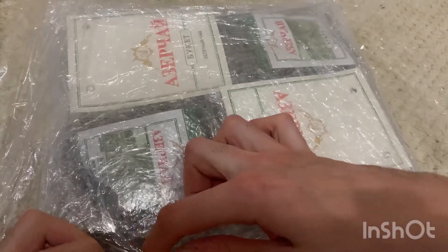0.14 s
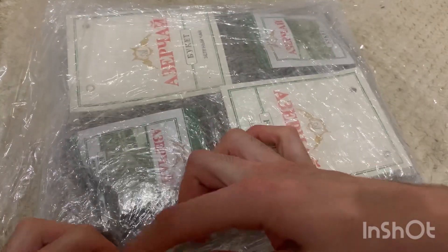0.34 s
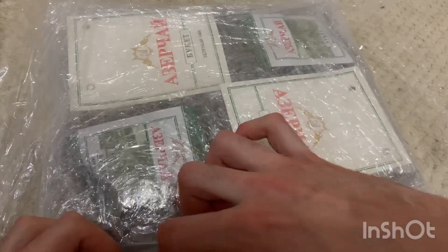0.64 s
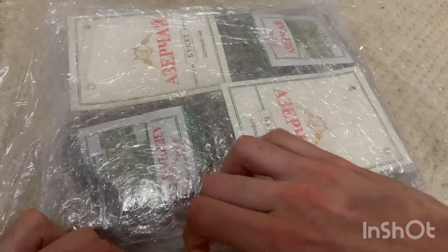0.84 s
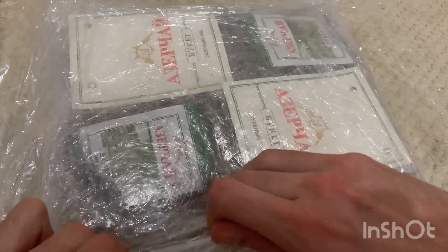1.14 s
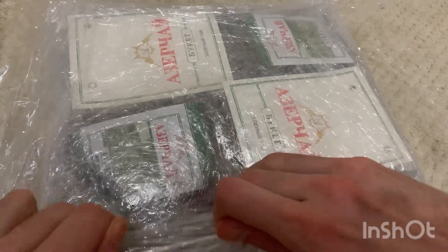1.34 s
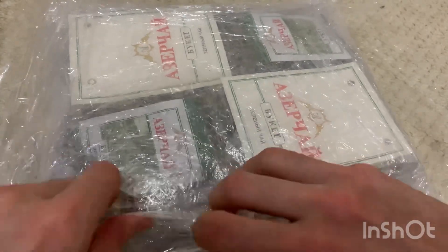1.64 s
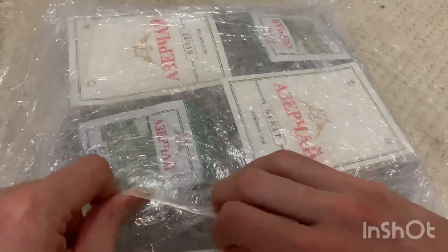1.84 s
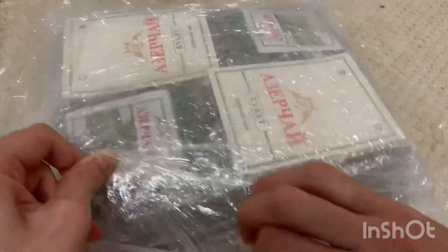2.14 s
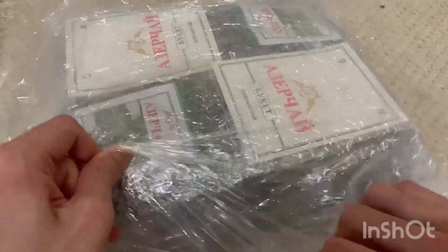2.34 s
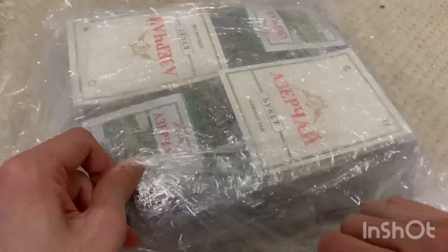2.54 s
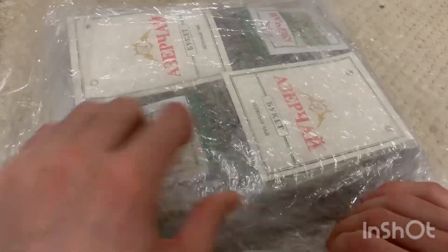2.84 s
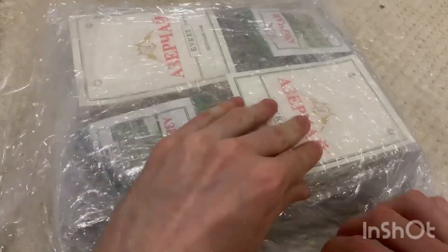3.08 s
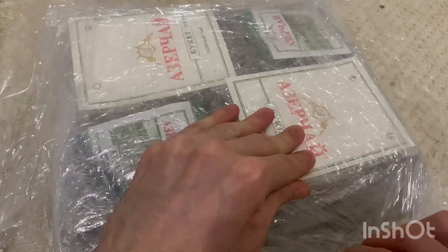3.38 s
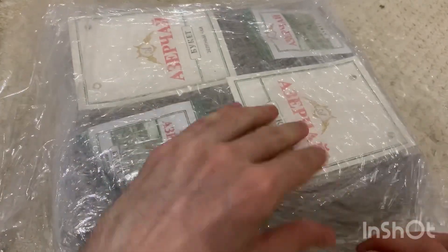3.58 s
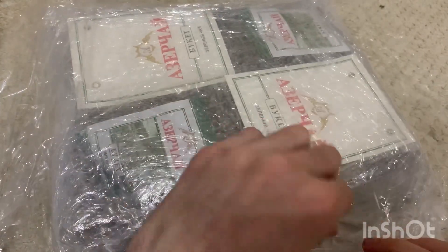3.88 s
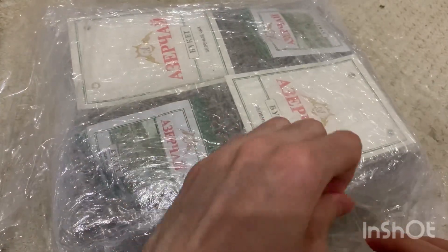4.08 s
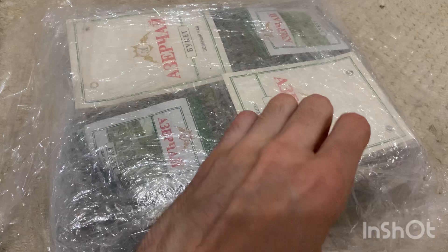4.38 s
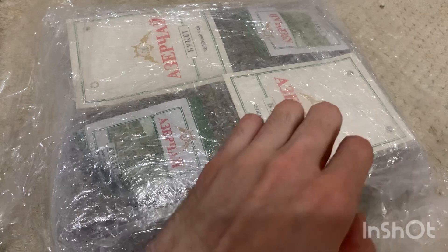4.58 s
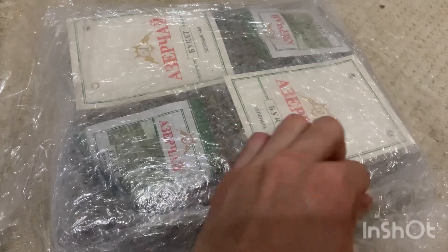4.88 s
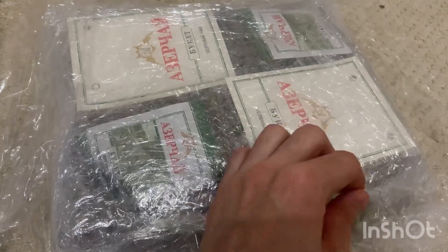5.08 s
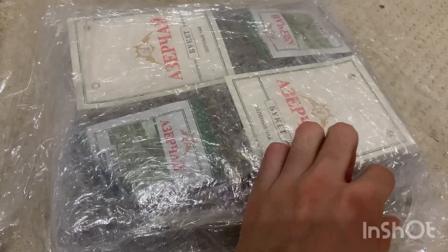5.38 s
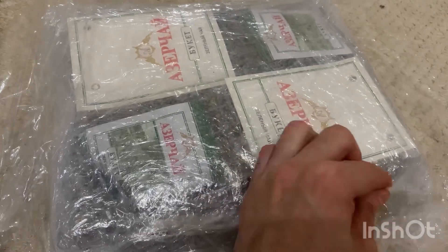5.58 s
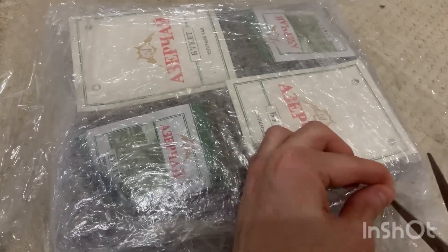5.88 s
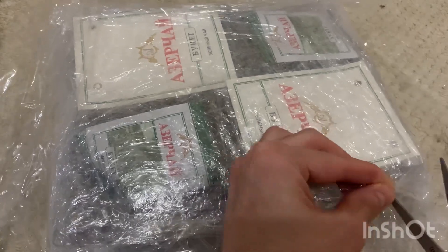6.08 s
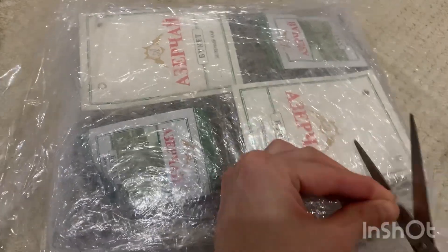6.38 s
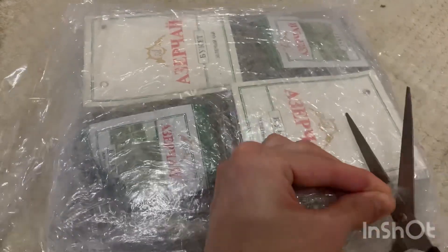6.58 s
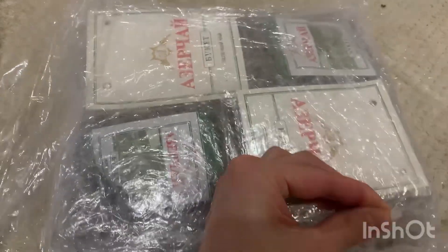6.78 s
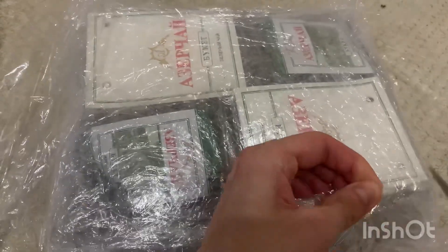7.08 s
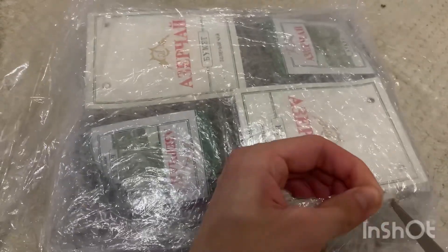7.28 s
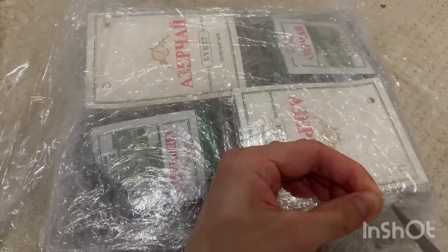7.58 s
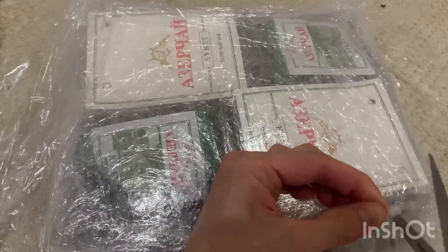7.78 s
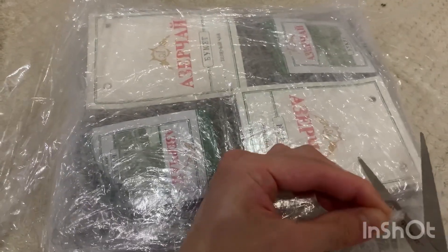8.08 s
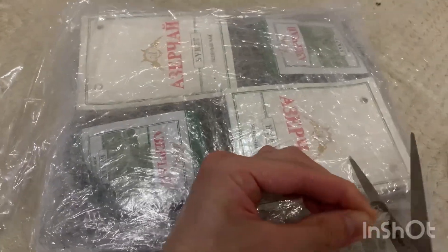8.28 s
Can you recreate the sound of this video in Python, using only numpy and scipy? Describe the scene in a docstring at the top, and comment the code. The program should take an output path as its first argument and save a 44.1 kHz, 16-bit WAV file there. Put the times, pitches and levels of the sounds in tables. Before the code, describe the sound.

Hands tug clingy film off a bundle: bright crackling swells, sharp snaps and dull pops, later only faint rustles with a few sudden cracks.

```python
"""Peeling plastic stretch wrap

Two hands pull stretch wrap off a bundle of packs, close to a stereo microphone in a small room.
Each stroke drives swarms of tiny cracks, coloured as sheet, creases and cling; wrinkles tick above them.
Creases snap with noise kicks and diving twangs, slack film pops, shifting packs rub through a resonance.
The work moves from the left hand to the right, over filtered-noise room air and a wavering hum."""
import sys
import numpy as np
from scipy import signal
from scipy.fft import rfft, irfft, next_fast_len
from scipy.io import wavfile
from scipy.ndimage import uniform_filter1d, map_coordinates

SR = 44100
rng = np.random.default_rng(int(sys.argv[2]) if len(sys.argv) > 2 else 0)


def bounce(signal):
    """Save signal as a 16-bit WAV file at the path given by the first command-line argument."""
    frames = np.transpose(np.atleast_2d(signal))
    limited = np.clip(frames, -1, 1)
    pcm = np.round(limited * 32767).astype(np.int16)
    wavfile.write(sys.argv[1], SR, pcm)


N = 371763

# Room air. Each row: frequency in Hz, relative density in dB per Hz.
AIR_SPECTRUM = [(20, -23), (50, 15), (85, 11.5), (130, 6.5), (300, 5), (1000, -23), (4000, -56),
                (15000, -47)]
# Hand strokes. Each row: peak time in s, rise in s, fall in s, crackle in dB before voice trims,
# flapping of the sheet against that in dB.
STROKES = [(.057, 0.35, 0.065, -41.5, -7), (.257, 0.1, 0.031, -40.5, -2.5), (.45, .15, 0.44, -37, -6.5),
           (.665, 0.1, 0.19, -32.5, -7), (1.039, 0.16, 0.21, -30.5, -6.5), (1.208, 0.039, 0.024, -28, -5.5),
           (1.34, 0.055, 0.081, -38.5, -23), (1.62, 0.19, 0.25, -40.5, -1), (1.712, 0.029, 0.047, -31.5, 3),
           (1.904, 0.3, 0.23, -32.5, -3.5), (2.144, 0.16, 0.17, -24.5, -8.5),
           (2.367, 0.29, 0.22, -28.5, -6.5), (2.565, 0.05, 0.31, -32.5, -6.5), (2.82, 0.13, 0.18, -33, -4),
           (3.064, 0.14, 0.67, -32.5, -3.5), (3.262, 0.027, 0.33, -30.5, -9.5),
           (3.42, 0.025, 0.25, -31.5, -11), (3.747, 0.05, 0.14, -36, -4), (3.872, 0.027, 0.26, -34.5, -5.5),
           (4.069, 0.012, 0.023, -29.5, -9), (4.185, 0.12, 0.25, -40, -6), (4.35, 0.12, 0.048, -48, -4),
           (4.742, 0.14, 0.12, -40, -11.5), (5.457, 0.057, 0.41, -42, -3), (5.635, 0.015, 0.48, -46, -5),
           (5.888, 0.3, 0.15, -38, -3), (6.24, 0.41, 0.021, -39.5, -10), (6.37, 0.14, 0.17, -35, -7),
           (6.659, 0.02, 0.056, -25.5, -5), (6.76, 0.24, 0.093, -37, -4.5), (6.97, 0.076, 0.03, -42.5, 1.5),
           (7.137, 0.98, 0.23, -45, -7), (7.33, 0.031, 0.17, -43.5, -18), (7.889, 0.031, 0.11, -43.5, -5)]
# Grip that keeps the film rustling between strokes. Each row: time in s, level in dB before voice trims.
GRIP = [(0, -42), (1.5, -40.5), (2.5, -47.5), (2.95, -58), (3.5, -43), (3.7, -39.5), (3.83, -50),
        (3.92, -42.5), (4.35, -41), (4.6, -54), (5.1, -53), (5.33, -44), (6.05, -53.5), (6.55, -66),
        (7.4, -51.5), (7.78, -51), (8.1, -50), (8.43, -48)]
# Tack, high while layers are peeled apart, low while the film is only pressed.
# Each row: time in s, cling against creases in dB before voice trims.
TACK = [(0, 2.5), (1.4, 5.5), (2.3, 4), (3.5, -0.5), (4.1, 0.5), (4.7, -3), (5.4, 0.5), (5.7, -1),
        (6.5, -1.5), (7.2, 1.5), (8.43, 0)]
# Stuck stretches that rip free at once. Each row: start in s, length in s, surge in dB.
RIPS = [(1.701, 0.017, 8.5), (1.881, 0.011, 6), (2.13, 0.011, 2.5), (2.367, 0.011, 7.5), (6.647, 0.013, 3)]
# Three voices of the film. Each row: frequency in Hz, relative density in dB per Hz.
SHEET_SPECTRUM = [(25, -30), (60, -21), (150, -6.5), (240, 1.5), (450, 0.5), (650, -3.5), (900, -3),
                  (1400, -6), (3000, -45)]
CREASE_SPECTRUM = [(250, -66.5), (700, -3), (1000, -5.5), (1600, -0.5), (2700, 0), (4200, -1), (5600, -1),
                   (6800, -6), (10000, -67)]
CLING_SPECTRUM = [(3000, -102), (6000, -3.5), (7500, 1.5), (9000, 4), (11500, 0.5), (14000, 3.5),
                  (15600, 3), (16200, -53)]
# Big snaps. Each row: time in s, then twang, crease and cling in dB over one millisecond before voice
# trims, twang pitch in Hz, crease pitch in Hz, crease Q.
SNAPS = [(.1787, -57, -45, -17, 477, 3800, 1), (.3156, -56, -32.5, -22.5, 500, 2770, 1.1),
         (.4446, -30, -24, -21, 620, 2900, 2.5), (1.1315, -45, -30, -19, 500, 4500, 1),
         (1.165, -45, -30, -14, 500, 5000, 1.2), (1.2366, -46, -20, -13, 550, 5110, 1.5),
         (1.3735, -49, -31, -17, 500, 4500, 1), (1.5593, -26, -42, -15, 220, 3440, 1),
         (1.7049, -14, -29, -9, 402, 1880, 0.88), (1.7184, -19.5, -16, -21, 374, 3640, 1),
         (1.8745, -38, -18, -9.5, 600, 3800, 0.88), (1.906, -29, -20, -9.5, 417, 3800, 0.68),
         (2.016, -47, -32, -15, 450, 4500, 0.63), (2.1245, -20.5, -22, -6, 255, 2900, 1.4),
         (2.1543, -22, -32, -7, 478, 3230, 1), (2.2165, -28, -28, -23, 432, 3900, 1),
         (2.2312, -41, -29, -20, 430, 3450, 2.2), (2.3225, -21, -22, -13, 1020, 2600, .7),
         (2.373, -17, -16, -14, 890, 3030, 1.3), (2.5668, -20, -17.5, -7, 314, 3700, 1.3),
         (3.0542, -24, -16.5, -12, 343, 3430, 0.47), (3.1305, -29, -15.5, -18, 390, 3380, 0.52),
         (3.2575, -37, -15.5, -15, 400, 3400, 1.7), (3.267, -20, -10, -10, 365, 2840, 2.3),
         (3.422, -22, -12.5, -24, 303, 2300, 1.2), (3.436, -34, -14, -18, 296, 2320, 1.5),
         (3.589, -22, -32, -22, 255, 2500, 1.6), (3.74, -48, -23, -39, 500, 5200, 3.3),
         (3.7528, -52, -20, -23, 500, 5070, 4.9), (3.875, -25, -27, -39, 370, 2750, 0.91),
         (3.9396, -34, -24, -15.5, 473, 2370, 1.5), (3.9684, -36, -21.5, -17, 350, 3280, 1.2),
         (4.072, -25, -26, -25, 590, 2400, 0.92), (4.2041, -28, -27, -15, 570, 1580, 1.9),
         (4.3524, -27.5, -32, -24.5, 440, 1750, 0.71), (4.5371, -45, -34, -29.5, 624, 2300, 0.44),
         (4.752, -40, -33, -42, 890, 2400, 1.1), (4.893, -43, -43, -47, 800, 1900, 1),
         (4.96, -60, -46, -41, 600, 2810, 1), (5.031, -50, -41, -36, 700, 2200, 0.86),
         (5.1493, -25.5, -21.5, -28.5, 350, 2030, 0.77), (5.3986, -33.5, -27, -30, 560, 5460, 0.97),
         (5.6303, -38, -30, -25.5, 810, 1500, 1.4), (5.7077, -31.5, -28, -19, 780, 3020, 1.9),
         (5.759, -34, -29.5, -26, 624, 3220, 1.3), (5.8583, -32, -22, -19.5, 273, 2450, 3.9),
         (5.865, -47, -34, -31, 400, 2400, 2.2), (5.9, -44, -35, -32, 500, 2500, 1.7),
         (6.083, -51, -31, -26, 510, 4000, 0.6), (6.1377, -61, -22.5, -41, 483, 5370, 1.5),
         (6.2427, -37, -25, -15, 434, 5210, 0.73), (6.257, -57, -19, -24, 410, 5300, 1.8),
         (6.3113, -36, -9, -12, 600, 2560, 4.6), (6.6288, -58, -34, -28, 450, 3800, 4),
         (6.652, -19.5, -21, -34, 404, 1500, 0.66), (6.8475, -60, -53, -31, 504, 3800, 1),
         (6.9154, -59, -41, -24.5, 730, 4800, 1), (6.9895, -52, -39, -30, 600, 1500, 1),
         (7.072, -44, -33, -25, 500, 3430, 1.6), (7.107, -41, -33, -28, 610, 3530, 1.8),
         (7.1146, -45, -27.5, -26, 560, 2360, 1.8), (7.1291, -35, -41, -23, 480, 2450, 1),
         (7.151, -60, -34, -27, 570, 3250, 1), (7.178, -55, -36, -36, 500, 3070, 1.5),
         (7.197, -44, -31, -26.5, 500, 3400, 1.2), (7.223, -58, -43, -30, 500, 3890, 1),
         (7.2781, -42, -28, -22.5, 534, 3640, 0.9), (7.3168, -55, -36, -24, 500, 3500, 1.1),
         (7.3218, -52, -26.5, -24, 488, 3370, 1.8), (7.3242, -59, -31, -24, 488, 2700, 2),
         (7.348, -57, -34, -27, 500, 4250, 2.2), (7.3659, -44, -36, -24, 573, 3320, 1.4),
         (7.3735, -57, -31, -21, 497, 2400, 1.4), (7.3992, -43, -29.5, -24, 500, 3780, 1.7),
         (7.478, -43, -34, -26.5, 340, 2300, 1.3), (7.5037, -33, -24.5, -25, 417, 2740, 0.34),
         (7.543, -58, -36, -41, 500, 3300, 1), (7.5761, -60, -28.5, -30, 360, 3600, 2.2),
         (7.5985, -60, -43, -28, 500, 4000, 1), (7.6204, -16, -14, -9, 616, 1350, 1),
         (7.7028, -44, -33, -36, 500, 3000, 0.96), (7.74, -53, -36, -33, 500, 2780, 1.1),
         (7.847, -39, -34, -51, 554, 3500, 1.7), (7.9108, -46, -29, -28, 520, 2300, 2.4),
         (7.967, -37, -37, -27.5, 600, 2000, 0.59), (8.121, -43, -38, -32, 500, 2330, 2.9),
         (8.1475, -41, -29.5, -26, 390, 2550, 3.1), (8.2046, -63, -33, -46, 500, 4430, 1.4),
         (8.259, -38, -28.5, -28.5, 560, 4050, 1.1), (8.4134, -35.5, -20.5, -16.5, 430, 4000, 0.42)]
# Clearest pops of slack film. Each row: time in s, level in dB over one millisecond before trim, pitch in Hz.
POPS = [(.203, -25.5, 464), (.255, -26, 428), (.662, -26, 726), (.743, -22.5, 610), (.908, -26, 528),
        (.947, -21.5, 770), (1.0, -23, 630), (1.051, -21, 590), (1.131, -29, 347), (1.372, -22.5, 485),
        (1.793, -24.5, 326), (1.829, -20.5, 386), (1.885, -30, 237), (1.916, -18, 450), (2.04, -22.5, 424),
        (2.065, -22, 506), (2.321, -23, 446), (2.65, -26, 410), (2.752, -28, 288), (3.12, -23, 382),
        (3.322, -32, 268), (3.349, -27, 326), (3.548, -24, 266), (5.928, -28, 674), (6.228, -30, 420),
        (6.3132, -10.5, 366), (6.756, -25, 600), (6.958, -40, 417), (7.622, -29, 900)]
# Shifts of the packs. Each row: start in s, length in s, approximate peak in dB, resonance in Hz.
NUDGES = [(2.02, 0.036, -52, 80), (2.116, 0.047, -54, 100), (2.355, .08, -42.5, 88),
          (2.606, 0.047, -49, 59), (3.048, .04, -55, 90), (3.868, 0.041, -53, 133),
          (4.081, 0.043, -52, 79.6), (4.384, 0.12, -49.5, 220), (5.47, 0.036, -46, 212),
          (5.852, .05, -47, 225), (6.314, 0.036, -40, 93), (6.32, 0.18, -50, 380), (6.65, 0.049, -42, 105),
          (6.646, .06, -34.5, 238), (6.691, .12, -47, 200), (7.726, 0.22, -55.5, 350),
          (7.736, 0.21, -57, 50), (7.8, 0.13, -54, 126), (8.11, 0.058, -53.5, 129), (8.287, .08, -54, 60)]
# Lead of the right port for sound from each hand. Each row: frequency in Hz, phase in radians.
LEFT_HAND_LEAD = [(100, 0), (1000, -.8), (2000, -2.25), (3200, -3.1), (4800, .4), (6100, 1.1), (7150, 3.14),
                  (8700, 5.9), (9900, 6.5), (11650, 9.42), (13300, 12.3), (14600, 12.7), (16000, 15.5)]
RIGHT_HAND_LEAD = [(100, 0), (2000, 0), (3300, -.9), (4900, -.2), (6000, 1.9), (7200, 3.2), (9400, 6.2),
                   (11600, 9.42), (14000, 12.6), (16000, 15.3)]
# Left-right likeness before widening. Each row: frequency in Hz, likeness from 0 to 1.
LIKENESS = [(100, .88), (300, .94), (600, .92), (1700, .82), (3200, .82), (5300, .45), (7200, .82),
            (9300, .9), (11700, .95), (15500, .76)]
# Room decay. Each row: frequency in Hz, time to fall 60 dB in s.
ROOM_T60 = [(150, 0.25), (1000, 0.12), (4000, 0.14), (14000, 0.013)]

TOP_HZ = 16500
GRIP_SHEET_DB = -2.5  # sheet against creases
STROKE_DROP_DB, STROKE_CURVE = 25, 2.19  # drop one rise before or one fall after the peak; power of the curve
TREMOR_DB, TREMOR_RATE_HZ = 1.25, 25  # fingers slip unevenly
RIP_RELEASE_S = 0.00061
RUBBING_SHARE = .05  # smooth rubbing under the crease and cling cracks
CREASE_LIFE_S, CLING_LIFE_S = .0004, .00025  # power decay of one tiny crack
TICKS_PER_S, SMALL_SNAPS_PER_S, POPS_PER_S = 110, 16, 9
SNAP_CREASE_LIFE_S = .0007  # amplitude decay
SNAP_CLING_LIFE_S = .00038  # power decay
ROOM_SHIFT_S = .25  # interval between room responses


def amp(db):
    """Decibels to gain."""
    return 10 ** (np.asarray(db) / 20)


def unit(x):
    """Scale x to rms 1."""
    return x / np.sqrt(np.mean(x ** 2) + 1e-20)


def along(points, hz):
    """Interpolate (Hz, value) points on a log-frequency axis."""
    f, v = np.transpose(points)
    return np.interp(np.log(hz + 1), np.log(f), v)


def wobble(knots_per_s):
    """Random curve of straight segments between Gaussian knots."""
    knots = rng.standard_normal(int(N * knots_per_s / SR) + 4)
    return map_coordinates(knots, [np.arange(N) * knots_per_s / SR], order=1)


def moments(per_s):
    """Sample indices of uniformly scattered chance events."""
    return (rng.random(int(per_s * N / SR)) * N).astype(int)


def add(track, start_s, wave):
    """Add a wave to the track in place, cut at the track's end."""
    part = track[..., round(start_s * SR):][..., :wave.shape[-1]]
    part += wave[..., :part.shape[-1]]


def one_ms(wave):
    """Scale to the energy of one millisecond at full level."""
    return wave / np.linalg.norm(wave, axis=-1, keepdims=True) * np.sqrt(SR / 1000)


def filtered(x, response):
    """Multiply the spectrum of x by a complex response."""
    m = next_fast_len(N + 8192, True)
    return irfft(rfft(x, m) * response(np.fft.rfftfreq(m, 1 / SR)), m)[..., :N]


def coloured(x, spectrum, size=4096):
    """Minimum-phase filter that keeps the power of white noise."""
    cepstrum = irfft(np.log(amp(along(spectrum, np.fft.rfftfreq(size, 1 / SR)))))
    # fold the cepstrum to make the filter causal
    cepstrum[1:size // 2] *= 2
    cepstrum[size // 2 + 1:] = 0
    kernel = irfft(np.exp(rfft(cepstrum)))
    return signal.oaconvolve(x, kernel[None] / np.linalg.norm(kernel), axes=1)[:, :N]


def tinted(pair, depth_db):
    """Folds of differing size colour the cracks: random gains over time and frequency."""
    z = signal.stft(pair, nperseg=256)[2]
    field = uniform_filter1d(rng.standard_normal(z.shape[1:]), size=5, axis=0)
    field = uniform_filter1d(field, size=3, axis=1)
    gain = unit(amp(depth_db * unit(field)))
    return signal.istft(z * gain, nperseg=256)[1][:, :N]


def bursts(energy, life_s, spectrum):
    """Energy impulses become dying noise bursts, in two independent versions."""
    t = np.arange(SR // 25) / SR
    shape = np.exp(-t / life_s) * (1 - np.exp(-2 * t / life_s))
    power = np.abs(signal.oaconvolve(energy, shape / shape.sum()))[:N]
    return coloured(np.sqrt(power) * rng.standard_normal((2, N)), spectrum)


def background(air_db, hum_db, hum_hz=89.2, width=0.4):
    """Room air as noise with a bass lift, and a distant appliance's hum wavering in phase and level."""
    common, apart = coloured(rng.standard_normal((2, N)), AIR_SPECTRUM)
    air = np.array([common + width * apart, common - width * apart])
    rumble = signal.lfilter(*signal.butter(1, 150, fs=SR), air)
    air = air + rumble * (amp(1.5) - 1)
    phase = 2 * np.pi * hum_hz * np.arange(N) / SR + 0.68 * wobble(4.2)
    hum = np.sqrt(2) * np.sin(phase)
    return amp(air_db) * air + amp(hum_db + 0.29 * wobble(4)) * hum


def handling():
    """Sheet, crease and cling levels in dB: powers of grip and strokes add, under a finger tremor."""
    t = np.arange(0, N, 32) / SR
    creases = amp(np.interp(t, *np.transpose(GRIP))) ** 2
    sheet = creases * amp(GRIP_SHEET_DB) ** 2
    for peak_s, rise_s, fall_s, db, flap_db in STROKES:
        away = np.abs(np.where(t < peak_s, (peak_s - t) / rise_s, (t - peak_s) / fall_s))
        power = amp(db - STROKE_DROP_DB * away ** STROKE_CURVE) ** 2
        creases = creases + power
        sheet = sheet + power * amp(flap_db) ** 2
    cling = creases * amp(np.interp(t, *np.transpose(TACK))) ** 2
    tremor_db = TREMOR_DB * wobble(TREMOR_RATE_HZ)
    sample_s = np.arange(N) / SR
    return [np.interp(sample_s, t, 10 * np.log10(p)) + tremor_db for p in (sheet, creases, cling)]


def swarm(per_s, spread_db, clump_db):
    """Random crack sizes, one slot a sample, swelling together in little avalanches."""
    happens = rng.random(N) < per_s / SR
    size_db = spread_db * np.minimum(rng.standard_normal(N), 2.5)
    return happens * amp(size_db + clump_db * wobble(110))


def crackle(cracks, level_db, spectrum, life_s, vary_db, rub):
    """One film voice: cracks over a share of smooth rubbing, at the level of the pull."""
    energy = (cracks * amp(vary_db * rng.standard_normal(N))) ** 2
    # the hand feeds energy steadily; the cracks share it
    local = np.abs(uniform_filter1d(uniform_filter1d(energy, size=1500), size=1500))
    energy = energy / (local + 0.027)
    rub = np.clip(rub, 0, 1)
    return bursts(((1 - rub) * energy + rub) * amp(level_db) ** 2, life_s, spectrum)


def peeling(levels):
    """Layers let go: the same cracks excite sheet, creases and cling; hard pulls and rips add denser ones."""
    t = np.arange(N) / SR
    surge_db = np.zeros(N)
    for start_s, length_s, db in RIPS:
        edges_s = [-.001, 0, length_s, length_s + RIP_RELEASE_S]
        surge_db += db * np.interp(t - start_s, edges_s, [0, 1, 1, 0])
    sheet_db, crease_db, cling_db = [level + surge_db for level in levels]
    effort = np.clip(amp(cling_db + 33), 0, 1.2)
    cracks = swarm(per_s=420, spread_db=2.0, clump_db=5.0)
    cracks = cracks + effort * swarm(per_s=950, spread_db=-1.0, clump_db=1.5)
    sheet = crackle(cracks, sheet_db - 5.0, SHEET_SPECTRUM, life_s=0.0019, vary_db=4.0, rub=0.0098)
    creases = crackle(cracks, crease_db - 2.33, CREASE_SPECTRUM, CREASE_LIFE_S, vary_db=-0.5, rub=RUBBING_SHARE)
    cling = crackle(cracks, cling_db + 0.2, CLING_SPECTRUM, CLING_LIFE_S, vary_db=-1.5, rub=RUBBING_SHARE)
    return tinted(sheet + creases + cling, depth_db=3.0)


def ticks(at, level_db, pitch_hz, size_spread, cycles, scatter_db):
    """Decaying sines of a few cycles, each with its own pitch, strength and stereo spot."""
    strength, size, spot = np.clip(rng.standard_normal((3, len(at), 1)), -2, 2)
    age = np.arange(SR // 200)
    turns = np.minimum(pitch_hz * np.exp(size_spread * size), TOP_HZ) * age / SR
    waves = one_ms(np.sin(2 * np.pi * turns) * np.exp(-turns / cycles))
    waves = waves * amp(level_db[at, None] + scatter_db * strength)
    slots = (at[:, None] + age).ravel()
    return np.array([np.bincount(slots, w.ravel(), N)[:N] for w in (waves, waves * spot)])


def wrinkles(crease_db, cling_db):
    """A wrinkle flips with a low tick of the fold and a sharp one of the cling."""
    at = moments(TICKS_PER_S)
    folds = ticks(at, crease_db - 3.5, pitch_hz=3290, size_spread=0.445, cycles=3.1, scatter_db=4.0)
    cling = ticks(at, cling_db - 2.5, pitch_hz=10230, size_spread=0.23, cycles=2.6, scatter_db=2.5)
    return folds + cling


def small_snaps(crease_db, cling_db, usual_db=-43.5, at_level_db=-46, growth=0.84, drift_db_per_s=-0.1,
                twang_db=-10, bright_db=7.0, scatter_db=3, twang_hz=520, crease_hz=3300, size_spread=0.28):
    """Rows like SNAPS for lesser folds: stronger where the film is worked harder, weakening slowly with time."""
    at = moments(SMALL_SNAPS_PER_S)
    strength, flap, stick, patch, fold = np.clip(rng.standard_normal((len(at), 5)), -2, 2).T
    db = usual_db + growth * (crease_db[at] - at_level_db) + drift_db_per_s * at / SR + scatter_db * strength
    stick_db = db + (cling_db - crease_db)[at] + bright_db + scatter_db * stick
    return np.transpose([at / SR, db + twang_db + scatter_db * flap, db, stick_db,
                         twang_hz * np.exp(size_spread * patch), crease_hz * np.exp(size_spread * fold),
                         np.ones(len(at))])


def neighbours(rows, delay_s=0.0063, loss_db=12, knee_db=-27, size_spread=0.25, early_share=0.41):
    """Rows like SNAPS: a weaker fold next to each big snap gives way just before or after it."""
    s, twang_db, crease_db, cling_db, twang_hz, crease_hz, q = np.transpose(rows)
    wait, fold = np.clip(rng.standard_normal((len(s), 2)), -2, 2).T
    side = np.where(rng.random(len(s)) < early_share, -1, 1)
    at_s = np.clip(s + side * delay_s * np.exp(wait / 2), 0, (N - 1) / SR)
    # snaps above the knee lose more
    drop_db = loss_db + np.maximum(crease_db - knee_db, 0) / 2
    return np.transpose([at_s, twang_db - 2 * drop_db, crease_db - drop_db, cling_db - drop_db,
                         twang_hz, crease_hz * np.exp(size_spread * fold), q])


def buckle(pitch_hz, q, life_s, reach=2.22, kick=2.4):
    """A fold kinks: a kick and brief noise rattle through its resonance, low-passed at reach times pitch."""
    t = np.arange(SR // 100) / SR
    rattle = rng.standard_normal((2, len(t))) * np.exp(-t / life_s) * (1 - np.exp(-2 * t / life_s))
    rattle[0, SR // 2500] += kick
    ring = signal.lfilter(*signal.iirpeak(pitch_hz, q, fs=SR), rattle)
    return one_ms(signal.lfilter(*signal.butter(2, min(reach * pitch_hz, TOP_HZ), fs=SR), ring))


def twang(pitch_hz, taut, relax, cycles, fade, lowest_hz=85):
    """A bending wave in freed film: highs arrive first, so the pitch dives within a few cycles."""
    turns = pitch_hz * np.arange(SR // 20) / SR
    hz = pitch_hz * taut / (1 + turns / relax)
    swing = (1 - np.exp(-6 * turns)) * np.exp(-(turns / cycles) ** fade)
    wave = np.sin(2 * np.pi * np.cumsum(hz) / SR) * swing
    # the thin sheet radiates little bass
    return one_ms(signal.lfilter(*signal.butter(4, lowest_hz, 'high', fs=SR), wave))


def snaps(rows):
    """A crease gives way: cling lets go, the fold kinks, the sheet twangs."""
    pair, cling = np.zeros((2, N)), np.zeros(N)
    for s, twang_db, crease_db, cling_db, twang_hz, crease_hz, q in rows:
        cling[round(s * SR)] = SR / 1000 * amp(cling_db - 3.0) ** 2  # energy of one millisecond
        add(pair, s, amp(crease_db - 2.47) * buckle(crease_hz, q, SNAP_CREASE_LIFE_S))
        add(pair[0], s, amp(twang_db - 1.75) * twang(twang_hz, taut=2.416, relax=0.95, cycles=3.33, fade=3.2))
    return pair + tinted(bursts(cling, SNAP_CLING_LIFE_S, CLING_SPECTRUM), depth_db=2.5)


def small_pops(sheet_db, over_db=6, scatter_db=-1.0, pitch_hz=520, size_spread=0.32):
    """Rows like POPS for lesser patches, following the level of the flapping sheet."""
    at = moments(POPS_PER_S)
    strength, size = np.clip(rng.standard_normal((len(at), 2)), -2, 2).T
    db = sheet_db[at] + over_db + scatter_db * strength
    return np.transpose([at / SR, db, pitch_hz * np.exp(size_spread * size)])


def pops(rows):
    """Slack patches of film flip over with a dull, diving pop."""
    pair = np.zeros((2, N))
    for s, db, hz in rows:
        add(pair[0], s, amp(db - 3.0) * twang(hz, taut=1.63, relax=1.9, cycles=2.33, fade=1.28))
    return pair


def nudges(q=1.7, width=0.33):
    """Packs shift: a short swell of rubbing noise passes twice through one broad resonance."""
    pair = np.zeros((2, N))
    for s, length_s, db, hz in NUDGES:
        swell = np.sin(np.linspace(0, np.pi, round(length_s * SR)))
        body = signal.iirpeak(hz, q, fs=SR)
        rub = signal.lfilter(*body, rng.standard_normal((2, SR // 2)))
        rub = signal.lfilter(*body, rub)
        # give the rub the swell's own energy
        common, apart = one_ms(rub[:, -len(swell):] * swell) * np.linalg.norm(swell) / np.sqrt(SR / 1000)
        add(pair, s, amp(db) * np.array([common + width * apart, common - width * apart]))
    return pair


def at_ports(pair, handover_s=2.29, width=1.06):
    """The wide film reaches the two ports partly alike, with phases set by the working hand."""
    def spread(hz):
        """Gains of the common and differing parts."""
        turn = width * np.arccos(np.clip(along(LIKENESS, hz), 0, 1)) / 2
        return np.array([np.cos(turn), np.sin(turn)])

    def heard(x, lead):
        """Split the phase lead between the ports."""
        return filtered(x, lambda hz: np.exp(.5j * along(lead, hz) * np.array([[-1], [1]])))

    common, apart = filtered(pair, spread)
    both = np.array([common + apart, common - apart])
    right = np.clip((np.arange(N) / SR - handover_s) / 0.02, 0, 1)
    from_left = heard(both * (1 - right), LEFT_HAND_LEAD)
    from_right = heard(both * right, RIGHT_HAND_LEAD) * amp([[-.5], [.5]])
    return from_left + from_right


def room_tail(bass_db=-3.0):
    """Walls answer with a short diffuse noise tail, its decay and bass level set by frequency."""
    hz, t, z = signal.stft(rng.standard_normal((2, SR // 3)), SR, nperseg=256)
    balance_db = along([(350, bass_db), (900, 0)], hz)[:, None]
    decay_db = 60 * t / along(ROOM_T60, hz)[:, None]
    tail = signal.istft(z * amp(balance_db - decay_db), SR, nperseg=256)[1]
    # long waves reach both ports alike
    tail[1] += signal.lfilter(*signal.butter(1, 1100, fs=SR), tail[0] - tail[1])
    return np.pad(tail / np.linalg.norm(tail[0]), ((0, 0), (SR // 300, 0)))


def room(x):
    """Hands change place: each successive stretch of sound gets its own tail."""
    wet, hop = np.zeros((2, N)), round(ROOM_SHIFT_S * SR)
    for start in range(0, N, hop):
        add(wet, start / SR, signal.fftconvolve(x[None, start:start + hop], room_tail(), axes=1))
    return wet


def scene():
    """Film and bundle, their room and its quiet floor."""
    levels = sheet_db, crease_db, cling_db = handling()
    snap_rows = [*SNAPS, *neighbours(SNAPS), *small_snaps(crease_db, cling_db)]
    film = peeling(levels) + wrinkles(crease_db, cling_db) + snaps(snap_rows)
    film = film + pops([*POPS, *small_pops(sheet_db)])
    close = at_ports(film) + nudges()
    return close + amp(-12.0) * room(film[0]) + background(air_db=-62.0, hum_db=-63.5)


def record(dry):
    """The recorder rounds off the tallest peaks and keeps nothing above its band limit."""
    rounded = dry / (1 + (dry / .8) ** 6) ** (1 / 6)
    return filtered(rounded, lambda hz: hz < TOP_HZ)


dry = scene()
out = record(dry)
bounce(out)
```